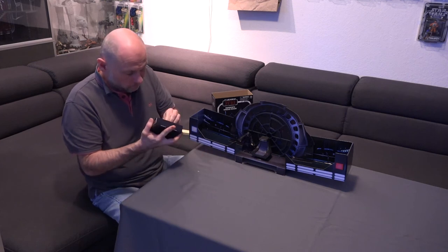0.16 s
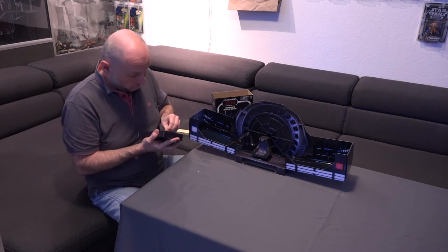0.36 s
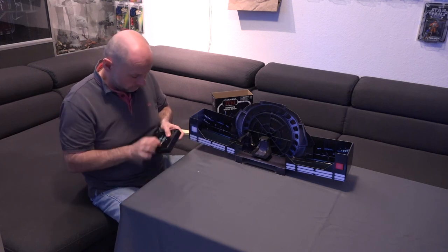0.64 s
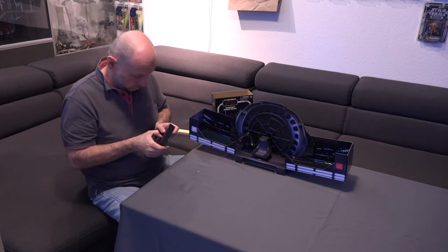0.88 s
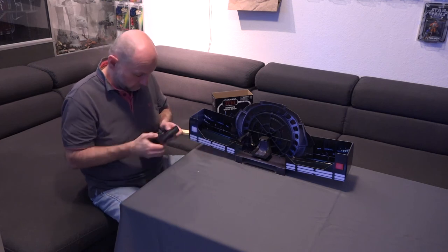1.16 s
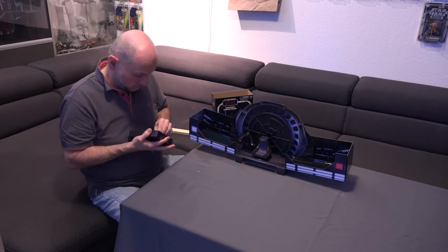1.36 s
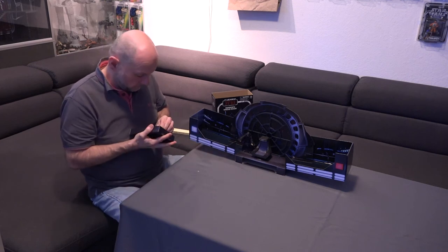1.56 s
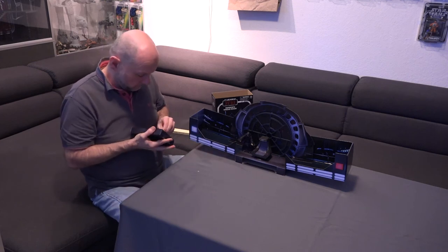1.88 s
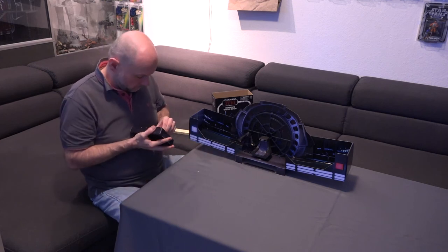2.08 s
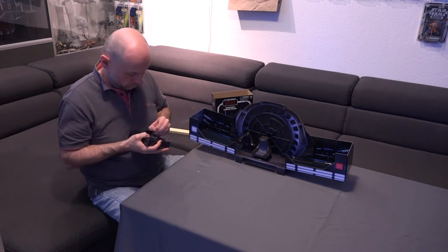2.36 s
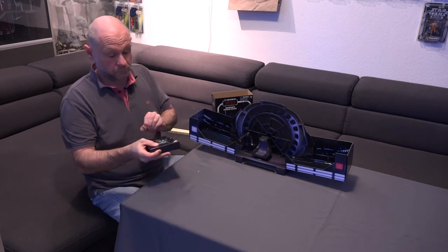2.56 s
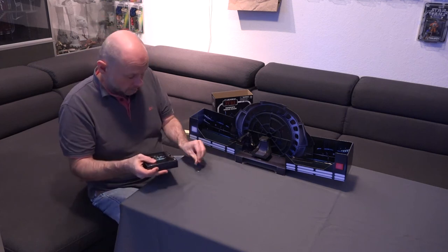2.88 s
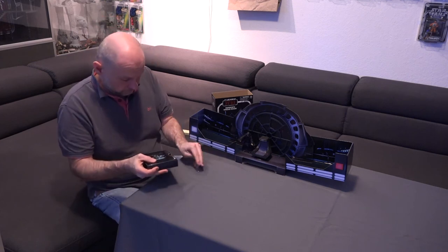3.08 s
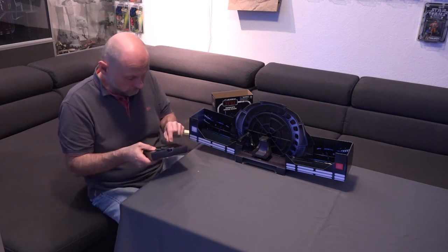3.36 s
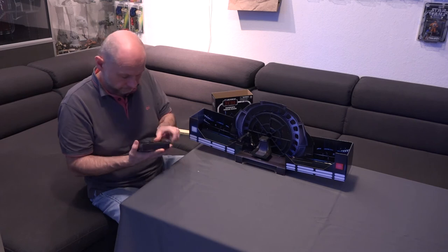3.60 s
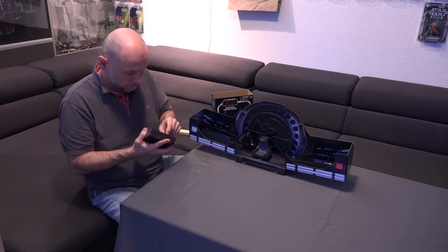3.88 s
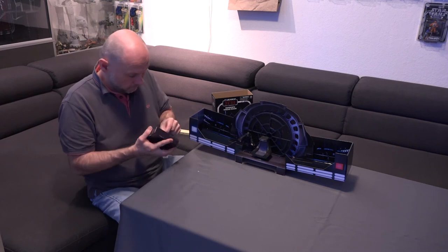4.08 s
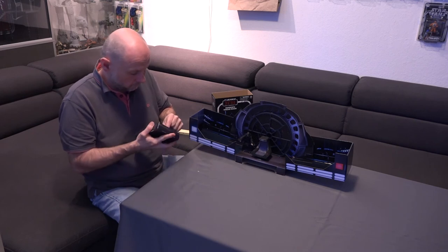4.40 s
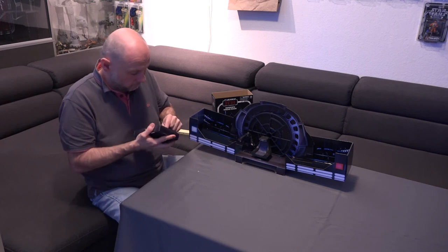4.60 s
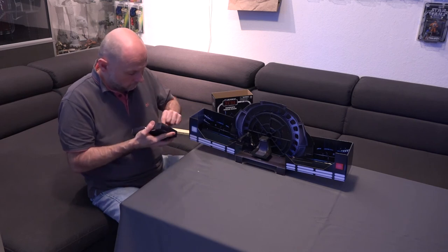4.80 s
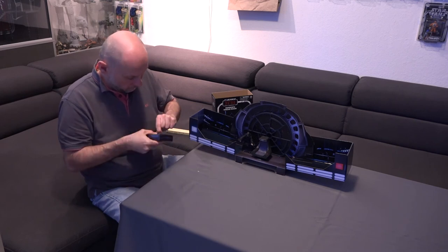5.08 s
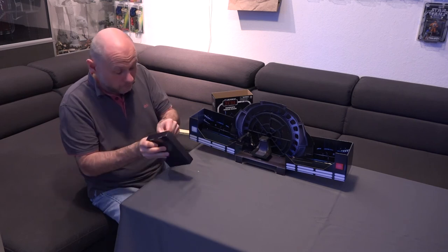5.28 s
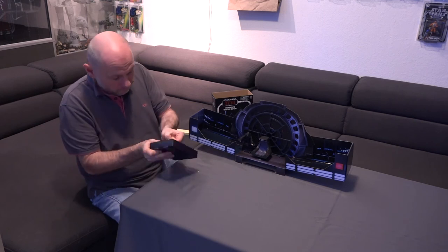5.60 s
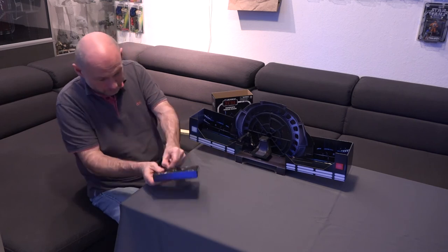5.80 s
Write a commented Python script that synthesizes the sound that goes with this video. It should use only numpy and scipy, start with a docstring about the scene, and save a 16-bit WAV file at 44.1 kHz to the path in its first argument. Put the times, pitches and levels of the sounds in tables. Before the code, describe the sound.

Fingertips pick a glued sticker off a small hollow cardboard box. Dense sharp snaps and ticks with tiny tearing crackles and low box bumps fill the first two and a half seconds; then a soft cloth wipe and a quieter finger slide, a short creak, and renewed picking with strong snaps to the end. Close, dry microphone in a quiet furnished room with faint hiss and a thin whine.

```python
"""Sticker torn off a box

Fingertips pick at an adhesive sticker on a small cardboard box and tear it off in scraps, in a quiet furnished room.
Each release of glue is a struck resonance with a crisp edge and a tearing tail; jolts ring the card, pushes boom in the
hollow box. Skin and film rub as filtered grit, a scrap wipes cloth, a finger slides along the box, the glue creaks
once in stick-slip pulses and a stiff edge pings. A low shuffle opens; a faint whine hangs in the room's hiss."""
import sys
import numpy as np
from scipy import signal
from scipy.fft import rfft, irfft, next_fast_len
from scipy.io import wavfile
from scipy.ndimage import map_coordinates

SR = 44100
rng = np.random.default_rng(int(sys.argv[2]) if len(sys.argv) > 2 else 0)


def dump(signal):
    """Clip the signal to [-1, 1] and save it as 16-bit WAV at the path in sys.argv[1]."""
    limited = np.clip(np.atleast_2d(signal).T, -1, 1)
    pcm = np.round(limited * 32767).astype(np.int16)
    wavfile.write(sys.argv[1], SR, pcm)


def voltage_ratio(level):
    """Linear amplitude factor for a level in decibels (scalar or array-like)."""
    return 10 ** (np.asarray(level, float) / 20)


N = 262130
LEAD = 0.005  # seconds of build-up before a burst peaks
SPAN = 2048  # samples in the row of one brief event


def unit(x):
    """Power normalisation: scale each row to rms 1."""
    return x / np.sqrt(np.mean(x ** 2, -1, keepdims=True) + 1e-20)


def peak_one(rows):
    """Peak normalisation: scale each row to a peak of 1."""
    return rows / np.abs(rows).max(-1, keepdims=True)


def along(points, hz):
    """Logarithmic frequency scale: interpolate (Hz, value) points evenly in pitch."""
    f, value = np.transpose(points)
    return np.interp(np.log(hz + 1), np.log(f + 1), value)


def curves(rows):
    """Envelopes: one value per sample for each column after the time, -120 outside the rows unless they reach the end."""
    s, *columns = np.transpose(rows)
    now = np.arange(N) / SR
    return [np.interp(now, s, c, left=-120, right=c[-1] if s[-1] > 5.9 else -120) for c in columns]


def wobble(rate):
    """Slow random modulation: a smooth curve through rate random knots a second."""
    knots = rng.standard_normal(int(N * rate / SR) + 4)
    return map_coordinates(knots, [np.arange(N) * rate / SR])


def filtered(x, response):
    """Linear filtering: multiply the spectrum of x by a complex response of frequency."""
    n = x.shape[-1]
    m = next_fast_len(n + 4096)
    return irfft(rfft(x, m) * response(np.fft.rfftfreq(m, 1 / SR)), m)[..., :n]


def mode(f, hz, width):
    """Damped oscillator: one causal resonance with gain 1 at its centre."""
    return 1j * f * width / (hz * hz - f * f + 1j * f * width)


def body(modes, spread_db=0, count=1):
    """Modal superposition: resonances of alternating sign, struck at new strengths in each of count rows."""
    luck = rng.normal(0, 1, (count, len(modes)))

    def response(f):
        total = 0
        for k, (hz, width, db) in enumerate(modes):
            total = total + (-1) ** k * voltage_ratio(db + spread_db * luck[:, k:k + 1]) * mode(f, hz, width)
        return total
    return response


def coloured(x, spectrum):
    """Spectral shaping: filter x by a table of levels, then set its rms to 1."""
    return unit(filtered(x, lambda hz: voltage_ratio(along(spectrum, hz))))


def bursts(count, t60, rise=0.00035, kick=0):
    """Impulsive excitation: rows of noise that swell to LEAD, get a single kick there and decay exponentially."""
    t = np.arange(SPAN) / SR - LEAD
    envelope = np.where(t < 0, np.exp(np.minimum(t, 0) / rise), voltage_ratio(-60 * t / t60))
    noise = rng.standard_normal((count, SPAN)) * envelope
    return noise + kick * (np.arange(SPAN) == round(LEAD * SR))


def placed(times, rows):
    """Linear superposition: sum the rows, each from its own moment in seconds."""
    at = np.round(np.asarray(times) * SR).astype(int)[:, None] + np.arange(SPAN)
    return np.bincount(at.ravel(), rows.ravel(), N + 2 * SPAN)[:N]


def grit(per_s, spread_db, hiss):
    """Friction as a random impulse train: tiny clicks of very uneven size, in clumps, over some hiss."""
    chance = per_s / SR * voltage_ratio(6 * wobble(40))
    sizes = rng.standard_normal(N) * voltage_ratio(spread_db * np.minimum(rng.exponential(1, N), 3))
    clicks = (rng.random(N) < chance) * sizes
    return unit(clicks) + hiss * rng.standard_normal(N)


# Spectrum of the room's hiss. Each row: frequency in Hz, relative level per Hz in dB.
ROOM_SPECTRUM = [(25, -17), (50, -7), (120, -9), (300, -5), (800, 0), (2000, -2), (4000, -9), (7000, -10),
                 (15000, -14), (16500, -40)]
# Steady whine. Each row: frequency in Hz, mean level in dB.
WHINE_TONES = [(1599, -65)]


def room_tone():
    """Stationary noise plus a tone: hiss with a thin, faintly unsteady whine, both rising 12 dB just after the start."""
    now = np.arange(N) / SR
    whine = 0
    for hz, db in WHINE_TONES:
        phase = 2 * np.pi * hz * now + 0.6 * wobble(8)
        whine = whine + np.sqrt(2) * voltage_ratio(db + wobble(5.7)) * np.sin(phase)
    hiss = voltage_ratio(-60.5) * coloured(rng.standard_normal(N), ROOM_SPECTRUM)
    onset = voltage_ratio(np.interp(now, [0.075, 0.085], [-12, 0]))
    return onset * (hiss + whine)


# Decay of the furnished room. Each row: frequency in Hz, time to fall by 60 dB in seconds.
ROOM_DECAY = [(200, 0.031), (2000, 0.0335), (10000, 0.011)]


def walls(x):
    """Reverberation: a short room answer, each frequency of a noise tail dying at its own speed."""
    hz, t, z = signal.stft(rng.standard_normal(SR // 3), SR, nperseg=256)
    decay = voltage_ratio(-60 * t / along(ROOM_DECAY, hz)[:, None])
    tail = signal.istft(z * decay, SR, nperseg=256)[1]
    delayed = np.pad(x, (200, 0))  # samples
    return signal.fftconvolve(delayed, tail / np.linalg.norm(tail))[:N]


# Envelope of the opening shuffle. Each row: time in seconds, level in dB.
SHUFFLE_LEVEL = [(0, -50), (.012, -52), (.065, -53.5), (.11, -63)]
# Its muffled spectrum. Each row: frequency in Hz, relative level per Hz in dB.
SHUFFLE_SPECTRUM = [(24, -40), (40, -8), (411, -8), (878, -12), (961, -12), (1810, -13), (3000, -47),
                    (3900, -77), (6600, -120)]


def shuffle():
    """Low-passed noise: a low, dull shuffle fades as the picking begins."""
    level_db = curves(SHUFFLE_LEVEL)[0] + 3.75 * wobble(123)
    return voltage_ratio(level_db) * coloured(rng.standard_normal(N), SHUFFLE_SPECTRUM)


# Two strokes: a scrap wiped across the cloth, then a finger sliding along the box.
# Each row: time in seconds, level in dB (before a common lift).
WIPE_LEVELS = [
    [(2.78, -53), (2.788, -37), (2.81, -39.5), (2.85, -34.5), (2.9, -42.5), (2.94, -63.5)],
    [(3.07, -54), (3.09, -48.5), (3.25, -49.5), (3.3, -50.5), (3.34, -46), (3.37, -74)],
]
# Spectra of the cloth, then of the slide. Each row: frequency in Hz, relative level per Hz in dB.
CLOTH_SPECTRUM = [(200, -27), (830, -9), (1900, -13.5), (2600, -9), (3400, 1), (4400, -2.5), (5400, -10),
                  (14200, -8.5), (15800, -7.5), (16500, -46)]
SLIDE_SPECTRUM = [(180, -29), (300, -21.5), (638, -14), (1150, -12.5), (2100, -10), (2320, -13), (3030, -4),
                  (5640, -19), (6780, -11), (9490, -20), (15700, -15.5), (16500, -48)]


def wipes():
    """Sliding friction: contacts so dense they are nearly a hiss, first on the weave, then along the card."""
    def stroke(rows, spectrum):
        level_db = curves(rows)[0] + 5.0 + 0.58 * wobble(53)
        return voltage_ratio(level_db) * coloured(grit(per_s=3600, spread_db=2.5, hiss=1.15), spectrum)
    return stroke(WIPE_LEVELS[0], CLOTH_SPECTRUM) + stroke(WIPE_LEVELS[1], SLIDE_SPECTRUM)


# Slips of the creaking glue, at a wandering rate.
# Each row: time in seconds, slips per second, level in dB (before a lift).
CREAK_SLIPS = [(3.5695, 440, -43.5), (3.572, 440, -23), (3.577, 487, -22), (3.586, 397, -26.5),
               (3.591, 306, -30), (3.594, 950, -38)]
# Resonances of the box as it creaks. Each row: frequency in Hz, width in Hz, gain in dB.
CREAK_MODES = [(913, 582, 6), (1516, 166, 11.5), (2710, 1020, 6.5), (4530, 490, -11.5)]


def creak():
    """Stick-slip: a pulse train, its edges rounded, rings through the box."""
    rate, db = curves(CREAK_SLIPS)
    cycles = np.cumsum(np.maximum(rate, 0)) / SR
    slips = np.diff(np.floor(cycles + 1.4), prepend=0)
    size = voltage_ratio(db + 26.0 + rng.normal(0, 1.0, N))
    box = body(CREAK_MODES)
    return filtered(slips * size, lambda f: box(f) / (1 + 1j * f / 5500) ** 2)[0]


# Finger pushes on the hollow box. Each row: time in seconds, level in dB (before a lift), pitch scale in Hz.
PUSHES = [(0.2522, -30.5, 320), (0.8399, -33, 283), (1.0189, -39.5, 255), (1.0804, -33.5, 276),
          (1.1222, -36.5, 320), (1.1968, -29, 308), (1.2742, -43, 400), (1.424, -39.5, 296),
          (1.5753, -44, 324), (2.1365, -47, 387), (2.211, -36.5, 376), (2.3452, -37.5, 328),
          (2.5898, -46, 267), (3.6205, -44.7, 386), (3.804, -43, 270), (4.2069, -54, 378),
          (4.6635, -12, 278), (4.865, -46.5, 380), (5.0992, -52.5, 370), (5.1407, -38, 346),
          (5.244, -44, 264), (5.9266, -23.5, 255)]


def thumps():
    """Damped wall motion: a soft push is a low swing that slows as the wall settles, with a brief one-way shove of air."""
    s, db, hz = np.transpose(PUSHES)[:, :, None]
    t = np.arange(SPAN) / SR
    swing = np.sin(2 * np.pi * 1.38 * (hz * t) ** 0.555) * voltage_ratio(-60 * t / 0.022)
    shove = 0.465 * (t / 0.00184) * np.exp(1 - t / 0.00097)
    return placed(s[:, 0] + 0.00036, voltage_ratio(db + 4.5) * (swing + shove))


# Flicks of a stiff edge. Each row: time in seconds, starting level in dB.
EDGE_FLICKS = [(5.717, -20), (5.735, -30.5)]


def pings():
    """Free vibration: a flicked stiff edge sings one thin, decaying note."""
    s, db = np.transpose(EDGE_FLICKS)[:, :, None]
    t = np.arange(SPAN) / SR
    fade = np.cos(np.pi / 2 * np.arange(SPAN) / SPAN)  # ends the row in silence
    note = np.sin(2 * np.pi * 3030 * t)
    return placed(s[:, 0], voltage_ratio(db - 60 * t / 0.058) * fade * note)


# Resonances of the box walls. Each row: frequency in Hz, width in Hz, mean gain in dB.
CARD_MODES = [(439, 360, 10.5), (940, 670, 11), (1296, 2710, -4), (2396, 416, 4.5)]
# Jolts to the card. Each row: time in seconds, peak level in dB, pitch in Hz.
JOLTS = [(0.2522, -14.5, 1534), (0.3872, -28.5, 1120), (0.478, -45, 2600), (0.5542, -41.5, 2040),
         (0.6051, -30.5, 1024), (0.7502, -29, 1950), (0.7899, -40.5, 1830), (0.8087, -28, 1250),
         (0.8405, -36, 815), (0.8623, -21, 1520), (0.8772, -22, 2350), (0.9854, -26.5, 1880),
         (1.0183, -21, 1790), (1.0817, -20, 2380), (1.1249, -21.5, 1990), (1.133, -20, 1935),
         (1.1801, -22, 2320), (1.197, -15, 1790), (1.233, -30, 1144), (1.2721, -14.5, 940),
         (1.3134, -33, 1000), (1.3647, -33, 2160), (1.425, -25, 1080), (1.5027, -20.5, 1470),
         (1.572, -32.5, 1840), (1.6445, -30.5, 960), (1.8376, -29, 1440), (1.879, -40, 2360),
         (1.9148, -30.5, 2130), (2.1338, -23.5, 940), (2.1437, -27, 1060), (2.2108, -14, 1433),
         (2.2262, -26.5, 1134), (2.2993, -33, 2170), (2.3445, -9, 2074), (2.3777, -21, 1160),
         (2.3906, -23.5, 1130), (2.4342, -35, 890), (2.5334, -15, 2220), (2.5428, -27.5, 1070),
         (2.5933, -15, 1296), (2.7871, -32, 1960), (3.3867, -32, 990), (3.5174, -37, 2110),
         (3.803, -30, 2240), (3.8303, -23.5, 1720), (3.9115, -29, 1500), (4.038, -29, 1520),
         (4.2092, -21.5, 1705), (4.3024, -15, 2590), (4.376, -29, 1195), (4.4963, -31.5, 2380),
         (4.5213, -30.5, 1890), (4.5992, -30, 2520), (4.6637, -13, 790), (4.7816, -44, 2230),
         (4.7979, -29, 1520), (4.8642, -19, 2050), (4.8783, -21.5, 2630), (5.0592, -22.5, 913),
         (5.098, -17, 1490), (5.1375, -23.5, 1144), (5.2443, -19.5, 1620), (5.485, -34, 1990),
         (5.6639, -28, 2320), (5.6898, -29, 2260), (5.718, -20, 2010), (5.733, -40.5, 2270),
         (5.7667, -31, 2340), (5.8223, -28, 1800), (5.8339, -28.5, 2540), (5.9279, -20, 1730)]


def knocks():
    """Modal response: a nail or a tug jolts the card, and the walls nearest the jolt's pitch answer briefly."""
    s, db, hz = np.transpose(JOLTS)[:, :, None]
    count = len(JOLTS)
    card = body(CARD_MODES, spread_db=3.0, count=count)
    taps = bursts(count, 0.0026, rise=0.0001, kick=1.34)
    rows = filtered(taps, lambda f: (0.69 + card(f)) * mode(f, hz, 0.92 * hz) ** 2)
    return placed(s[:, 0] - LEAD - 0.0006, voltage_ratio(db) * peak_one(rows))


# How busy the fingers are. Each row: time in seconds, crackle of film and paper in dB, skin on card in dB,
# both before the lifts below.
FINGER_WORK = [(0, -82, -60), (.08, -64, -54), (.11, -50.5, -52), (.36, -49, -54.5), (.46, -53.5, -58),
               (.585, -50, -50), (.62, -50.5, -52.5), (.66, -57, -56), (.69, -50.5, -52.5),
               (.85, -55, -49.5), (.95, -48, -56.5), (1.22, -45.5, -52.5), (1.75, -53.5, -54),
               (1.92, -47, -53.5), (1.96, -63, -56), (2.07, -49, -57.5), (2.14, -41, -49),
               (2.38, -51, -53.5), (2.415, -88, -54), (2.445, -44, -50.5), (2.65, -61, -60.5),
               (3.04, -61.5, -53), (3.36, -53, -53), (3.42, -75, -50.5), (3.445, -47.5, -50.5),
               (3.53, -49.5, -56), (3.61, -45, -51), (3.79, -53, -58.5), (3.92, -53, -49),
               (3.97, -61, -55.5), (4.14, -51.5, -55.5), (4.53, -48.5, -56), (4.95, -54.5, -59),
               (5.03, -44, -59), (5.06, -46, -50.5), (5.16, -47.5, -52), (5.25, -42, -54),
               (5.38, -68, -57.5), (5.57, -55.5, -59), (5.68, -39.5, -53.5), (5.943, -47, -54)]
# Short runs of glue giving way. Each row: start in seconds, length in seconds, crackle lift in dB.
GLUE_RUNS = [(0.103, .01, 12), (0.286, 0.014, 7.5), (0.346, .012, 9), (.41, 0.017, 7.5),
             (0.508, .014, 12.5), (0.565, 0.041, 10.5), (0.671, .025, 8), (0.897, 0.011, 8),
             (1.218, 0.033, 7.5), (1.593, .01, 8), (1.799, .035, 10), (2.092, 0.023, 10), (3.318, .02, 9),
             (4.687, 0.013, 6), (4.894, 0.026, 8), (5.038, .02, 10.5), (5.081, .02, 9), (5.132, .03, 10),
             (5.925, .015, 11)]


def activity():
    """Amplitude modulation: slow finger work sets the levels; crackle is stirred up around loud snaps and in rips."""
    rise_s, fade_s, most_db, growth = 0.00493, 0.014, 11, 0.45  # growth: dB of stir drive per dB of snap
    rip_edge_s = 0.002
    crackle_db, dull_db = curves(FINGER_WORK)
    s, db = np.transpose(LOUD_SNAPS)[:2]
    impulses = np.bincount(np.round(s * SR).astype(int), voltage_ratio(growth * db), N)
    t = np.arange(-SR // 10, SR // 10 + 1) / SR
    swell = np.where(t < 0, np.exp(np.minimum(t, 0) / rise_s), np.exp(-np.maximum(t, 0) / fade_s))
    stir = np.tanh(np.abs(signal.fftconvolve(impulses, swell, "same")))  # saturates at 1
    now = np.arange(N) / SR
    rips_db = 0
    for start, length, lift_db in GLUE_RUNS:
        inside_s = np.minimum(now - start, start + length - now)
        rips_db = rips_db + lift_db * np.clip(inside_s / rip_edge_s + 1, 0, 1)
    return crackle_db + most_db * stir + rips_db, dull_db


def crackle(per_s, spread_db, cycles):
    """Granular emission: countless tiny glue threads part in clumps, each a damped sine at its own pitch."""
    grain = 96  # samples
    draw = rng.random((int(per_s * N / SR), 4))
    at = (draw[:, 0] * N).astype(int)
    clump_db = 5 * wobble(60)[at]
    hz = 6500 * np.exp(0.97 * (draw[:, 1:2] + draw[:, 2:3] - 1))
    size = voltage_ratio(clump_db - spread_db * np.log(draw[:, 3] + 0.0171))[:, None]
    t = np.arange(grain) / SR
    grains = size * np.sin(2 * np.pi * hz * t) * np.exp(-hz * t / cycles)
    summed = np.bincount((at[:, None] + np.arange(grain)).ravel(), grains.ravel(), N + grain)[:N]
    return unit(filtered(summed, lambda f: (1j * f / (1j * f + 1500)) ** 2))  # high-pass


# Spectra of film and paper, then of skin on card. Each row: frequency in Hz, relative level per Hz in dB.
PAPER_SPECTRUM = [(1180, -29), (2000, -47), (2150, -34.5), (2580, 0.5), (2900, -34), (3680, -2.5),
                  (7260, 8.5), (12200, 2.5), (15200, 11), (16500, -97.5)]
HANDLING_SPECTRUM = [(59, -63), (100, -20), (305, -7), (865, -3), (1250, -4.5), (1570, -5.5), (2170, -8),
                     (3500, -6.5), (4550, -12), (7700, -120)]


def rustle():
    """Contact noise: small crackle of film and paper; busier fingers also rub the card harder."""
    crackle_db, dull_db = activity()
    flutter = wobble(50)
    fizz = coloured(grit(per_s=3000, spread_db=7, hiss=0.22), PAPER_SPECTRUM)
    fizz = voltage_ratio(5 * flutter) * fizz
    crisp = voltage_ratio(-3.5) * crackle(per_s=700, spread_db=7.0, cycles=2.1) + voltage_ratio(-8.5) * fizz
    dull = coloured(grit(per_s=500, spread_db=5.5, hiss=0.66), HANDLING_SPECTRUM)
    rub_db = dull_db + 0.25 * (crackle_db + 50) + 2.5 * flutter
    return voltage_ratio(crackle_db) * crisp + voltage_ratio(rub_db) * dull


def small_snaps():
    """Random point process: rows like the loud snaps, at chance moments, their levels following the crackle there."""
    per_s = 60
    when, size, pitch, tail = rng.random((int(per_s * N / SR), 4)).T
    db = activity()[0][(when * N).astype(int)] + 14.5 - 3 * np.log(size + 0.04)
    hz = 6970 * np.exp(1.1 * (pitch - 0.5))
    tail_db = -11.5 - 16 * (tail - 0.5)
    return np.transpose([when * N / SR + LEAD * 2, db, hz, tail_db])


# The clearest glue and nail snaps. Each row: time in seconds, level in dB, ring in Hz,
# tearing tail in dB relative to that level.
LOUD_SNAPS = [(0.0968, -19, 6970, -3.5), (0.108, -3, 6850, -17), (0.1408, -18.5, 6600, -8.5),
              (0.1841, -11.5, 7080, -10.5), (0.2525, -3.5, 9180, -6.5), (0.2568, -15, 8100, -11),
              (0.292, -27, 5300, -5), (0.3059, -29, 11050, -14), (0.3335, -26, 7550, -8),
              (0.3662, -14.5, 7360, -28), (0.3856, -3, 7540, -13), (0.3973, -13, 6470, -26),
              (0.4057, -16, 6730, -13), (0.4795, -6.5, 5980, -9.5), (0.5166, -12.5, 7260, -14),
              (0.554, -16.5, 4100, -11), (0.585, -15, 8250, -11), (0.6972, -17.5, 6320, -8.5),
              (0.728, -23, 7310, -23), (0.7504, -16.5, 7590, -12.5), (0.7546, -15.5, 7580, -20),
              (0.7714, -16, 7670, -13), (0.7843, -11.5, 5270, -4.5), (0.788, -8.5, 7740, -19),
              (0.792, -16, 7790, -30), (0.8083, -2, 7460, -40.5), (0.8148, -19, 7580, -25),
              (0.8222, -5.5, 7600, -30), (0.8323, -27, 7070, -25), (0.8407, -1.5, 7010, -28.5),
              (0.8462, -5.5, 9000, -17.5), (0.8551, -25.5, 9170, -23.5), (0.862, -1, 4550, -27),
              (0.8667, -11, 9100, -7), (0.8709, -7.5, 7560, -17), (0.8759, -14, 7100, -17),
              (0.9067, -14, 7340, -28), (0.9753, -16, 7400, -13.5), (0.9841, 0, 6380, -20),
              (0.9985, -19, 6950, -8), (1.0169, -5, 7060, -4), (1.0801, -5, 6120, -3.5),
              (1.1247, -1.5, 6000, -13.5), (1.1332, -16, 7890, -9), (1.1575, -11, 6110, -25),
              (1.1798, -2.5, 6220, -28), (1.197, -2, 6600, -9.5), (1.2714, -6.5, 5680, -9),
              (1.3124, -8.5, 6130, -17), (1.3654, -4, 7430, -24), (1.3749, -8.5, 6890, -30.5),
              (1.399, -6.5, 7270, -28), (1.4057, -8, 6650, -34), (1.425, -0.5, 8760, -18.5),
              (1.4739, -18, 6950, -25), (1.4855, -7, 7370, -17), (1.4896, -3, 6720, -28),
              (1.501, -1.5, 7360, -10.5), (1.5669, -7.5, 6920, -20.5), (1.5727, -2, 6740, -28.5),
              (1.6359, -2.5, 6100, -36), (1.6443, -6, 7030, -19.5), (1.6498, -2.5, 6580, -43.5),
              (1.704, -7, 7450, -32.5), (1.714, -4, 6860, -31), (1.7328, -17, 4500, -28.5),
              (1.7555, -19, 7840, -15), (1.811, -16, 7500, -7), (1.8374, -4, 6040, -17),
              (1.8776, -10, 7070, -14), (1.9012, -14.5, 7050, -19), (1.9156, -8.5, 7860, -16),
              (1.923, -18, 6150, -9), (1.9671, -28.5, 6570, -17.5), (1.995, -26, 6840, -14),
              (2.0054, -29, 5320, -16), (2.0535, -40, 7620, -11), (2.0585, -40.5, 6580, -20),
              (2.1173, -12, 10130, -11.5), (2.1339, -13.5, 6050, 0.5), (2.1412, -12.5, 7360, -11),
              (2.2079, -3.5, 5860, -1), (2.2113, -4, 6400, -28.5), (2.2545, -15.5, 8150, -12),
              (2.2661, -13.5, 8150, -22), (2.299, -18, 6320, -22.5), (2.304, -13.5, 7640, -29.5),
              (2.3371, -17, 7370, -10), (2.344, -3, 6840, -8), (2.3782, -7.5, 6800, -9),
              (2.3895, -10, 6650, -5), (2.3924, -8.5, 6600, -10), (2.4329, -19, 7000, -9),
              (2.4437, -14.5, 7890, -10.5), (2.4798, -27, 6180, -19), (2.5033, -33.5, 5550, -13),
              (2.534, -8, 6170, -8), (2.5424, -9.5, 5200, -10), (2.5885, -9, 6700, -1),
              (2.5949, -13.5, 8160, -1), (2.6555, -26, 4280, -19.5), (2.7872, -15, 3400, -23.5),
              (3.046, -24.5, 11220, -10.5), (3.0514, -33.5, 6070, -26), (3.0705, -32, 7070, -15),
              (3.1008, -30, 4170, -3.5), (3.2145, -23.5, 6730, -14.5), (3.2861, -34.5, 7620, -12.5),
              (3.3, -18, 5890, -15), (3.3308, -20.5, 7510, -3.5), (3.334, -17, 7700, -13),
              (3.3773, -10.5, 11800, -17), (3.3865, -7.5, 8550, -16.5), (3.4316, -23, 8100, -8),
              (3.439, -21.5, 4600, -9), (3.4949, -30, 6200, -35), (3.5171, -19, 6420, -5),
              (3.6192, -14.5, 7940, -13), (3.6562, -37.5, 8450, -13.5), (3.6929, -40.5, 7220, -14.5),
              (3.6982, -42, 9030, -13), (3.753, -26, 6920, -5), (3.8023, 0.5, 9780, -19),
              (3.8305, -6.5, 5970, -31.5), (3.8614, -22, 7560, -19), (3.8902, -13, 6440, -24),
              (3.9, -0.5, 8140, -32.5), (3.9134, -5.5, 5940, -33), (3.9317, -8, 7500, -19),
              (3.938, -7, 7200, -31.5), (4.0168, -24, 6610, -5), (4.029, -15.5, 13180, -17),
              (4.0376, -10.5, 10080, -21), (4.099, -25, 6860, -2.5), (4.111, -25, 6260, -17.5),
              (4.1876, -17, 6300, -7), (4.202, -12, 9580, -17), (4.2047, -8.5, 6970, -14),
              (4.2082, 2, 7200, -16.5), (4.2124, -7, 5860, -25), (4.2673, -9.5, 10800, -15.5),
              (4.3035, -3.5, 5600, -23), (4.3293, -18, 7600, -8), (4.3765, -11, 5840, -12),
              (4.4134, -28.5, 7830, -5), (4.4304, -28, 7660, -7.5), (4.4618, -26, 6170, -15),
              (4.4877, -17.5, 6250, -10), (4.4928, -18.5, 6420, -17), (4.4959, -15, 6300, -26.5),
              (4.5597, -19.5, 6590, -32), (4.5692, -12, 6280, -30.5), (4.5999, -4.5, 9300, -39),
              (4.6301, -2.5, 6480, -30.5), (4.6495, -3.5, 6720, -38), (4.6638, -0.5, 7340, -9),
              (4.7412, -18.5, 5900, -26), (4.7552, -16, 6340, -35.5), (4.7796, -4, 5100, -25),
              (4.7983, -0.5, 8340, -23.5), (4.8649, -1, 5000, -18), (4.8693, -16.5, 5510, -9),
              (4.8781, -3.5, 9930, -33), (4.9246, -18, 4960, -28), (4.9679, -15, 8810, -22),
              (5.0027, -43.5, 6020, -25), (5.0513, -2.5, 7360, -32), (5.0538, -15, 8880, -7),
              (5.0598, -7, 6500, -12), (5.0986, -4.5, 6550, -11.5), (5.123, -22, 9060, -20),
              (5.1387, -16, 6590, -10), (5.1421, -18.5, 5840, -3), (5.1489, -17.5, 6520, -5),
              (5.2, -26, 9310, -14), (5.243, -0.5, 8020, -9.5), (5.2886, -20, 10600, -5.5),
              (5.2967, -22, 5350, -19), (5.327, -34.5, 6820, -16), (5.3948, -26.5, 6370, -1.5),
              (5.4216, -24, 4940, -6.5), (5.4859, -12.5, 10670, -6.5), (5.5867, -28, 7680, -13.5),
              (5.5992, -23, 5300, -8), (5.6293, -24, 5980, -10), (5.6611, -18, 7450, -2.5),
              (5.664, -7.5, 6470, -9.5), (5.6898, -4.5, 6880, -15), (5.7177, -3, 5140, -7.5),
              (5.732, -19, 6070, 4), (5.766, -18.5, 6570, -23), (5.8022, -15, 6840, -8),
              (5.8232, -17, 6060, -10), (5.8337, -11, 4700, -21.5), (5.838, -20, 6320, -5),
              (5.8423, -23, 6080, -13), (5.8737, -16, 7700, -14), (5.8781, -12.5, 7450, -29),
              (5.9276, 1.5, 7220, -11.5)]


def snaps():
    """Sudden strain release: the film rings a few cycles with a crisp edge; glue strains before and tears on after."""
    table = np.vstack([LOUD_SNAPS, small_snaps()])
    s, db, hz, tail_db = np.transpose(table)[:, :, None]
    count = len(table)
    ring = filtered(bursts(count, 0.0028, rise=0.00013, kick=1.35), lambda f: mode(f, hz, 0.28 * hz))
    edge = filtered(bursts(count, 0.0069, rise=0.00022, kick=1.42), lambda f: mode(f, 9600, 8550) ** 2)
    tear = filtered(bursts(count, 0.023, rise=0.00028), lambda f: mode(f, 4440, 8100) ** 2)
    edge_db = -13.0 + rng.normal(0, 3, (count, 1))
    mixed = voltage_ratio(-2.5) * peak_one(ring) + voltage_ratio(edge_db) * peak_one(edge) + voltage_ratio(tail_db) * peak_one(tear)
    return placed(s[:, 0] - LEAD - 0.0002, voltage_ratio(db) * mixed)


def scene():
    """Direct and reverberant sound: hands and box close by, in the room."""
    hands = snaps() + knocks() + thumps() + pings() + rustle() + wipes() + creak()
    return (hands + voltage_ratio(-36) * walls(hands) + shuffle() + room_tone())[None]


def top_cut(x):
    """Nothing passes above the cut-off."""
    return signal.sosfilt(signal.butter(12, 17010, fs=SR, output="sos"), x)


def record(dry):
    """Transducer response: the microphone sheds deep bass, lifts its presence band, rounds high peaks, limits the band."""
    def microphone(hz):
        bass_cut = (1j * hz / (1j * hz + 45)) ** 3
        presence = 0.91 + 0.4 * mode(hz, 6540, 990)
        return bass_cut * presence
    voiced = filtered(dry, microphone)
    rounded = voiced / (1 + np.abs(voiced / 0.8) ** 6) ** (1 / 6)
    finished = filtered(rounded, lambda hz: hz < 16900)
    return top_cut(finished)


dry = scene()
out = record(dry)
dump(out)
```